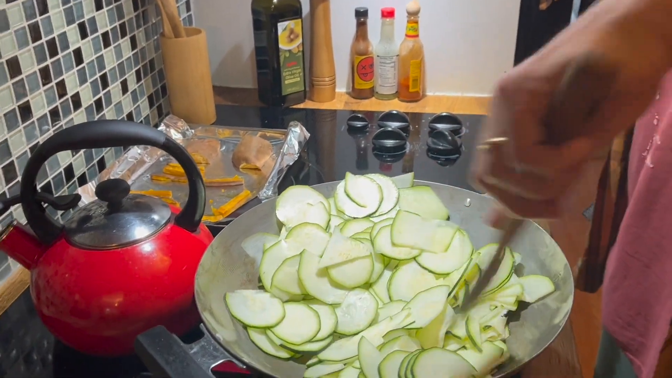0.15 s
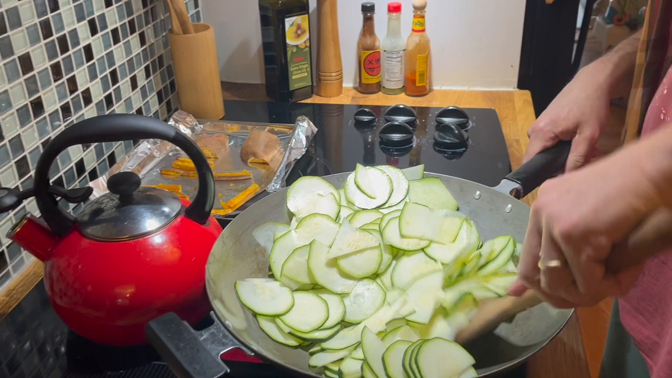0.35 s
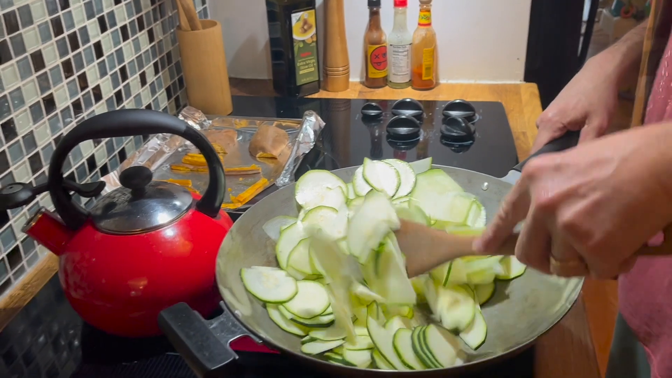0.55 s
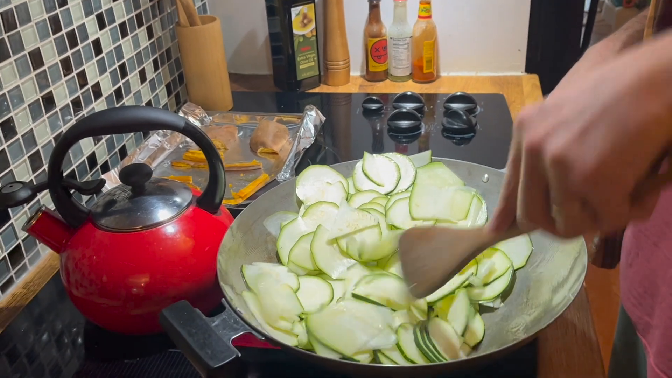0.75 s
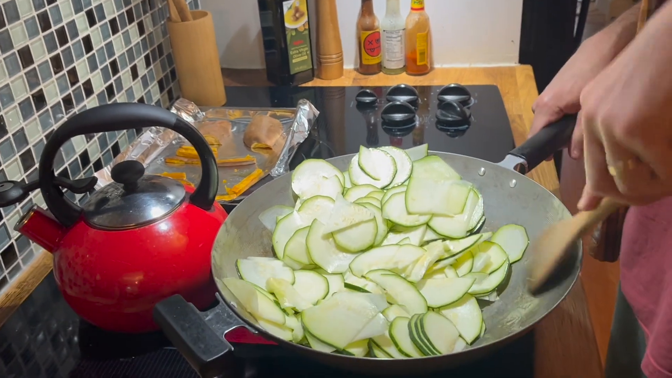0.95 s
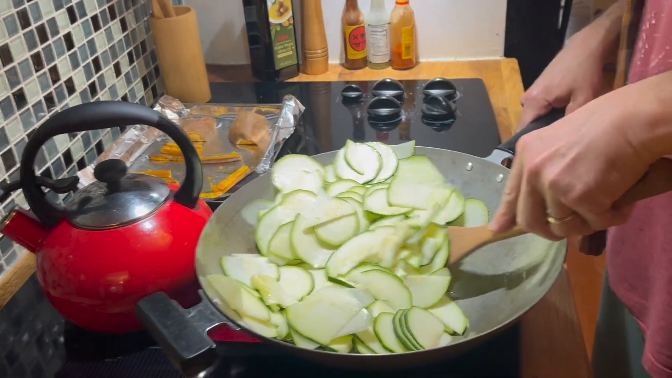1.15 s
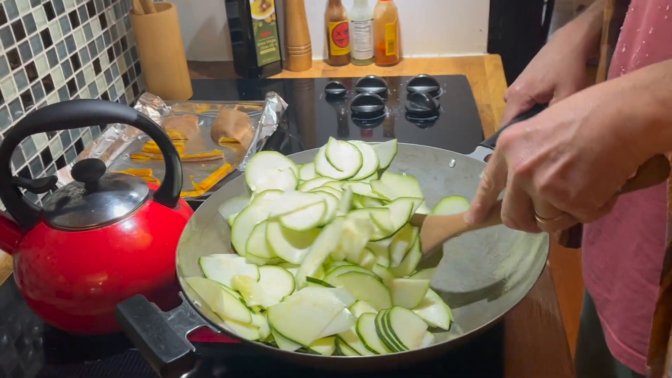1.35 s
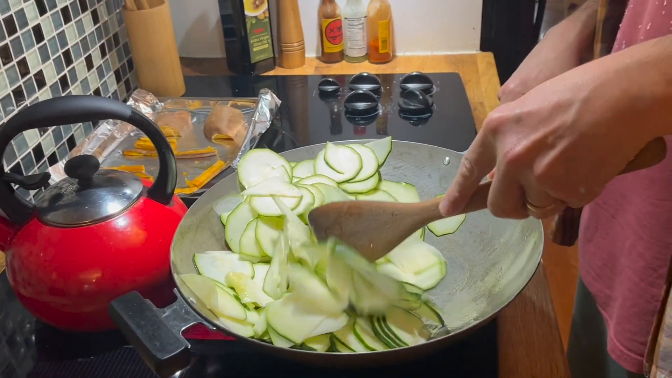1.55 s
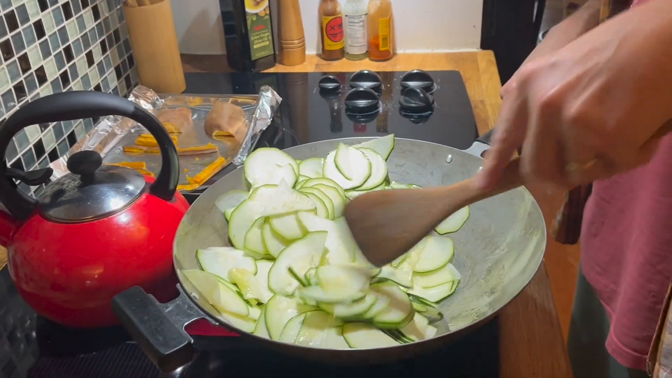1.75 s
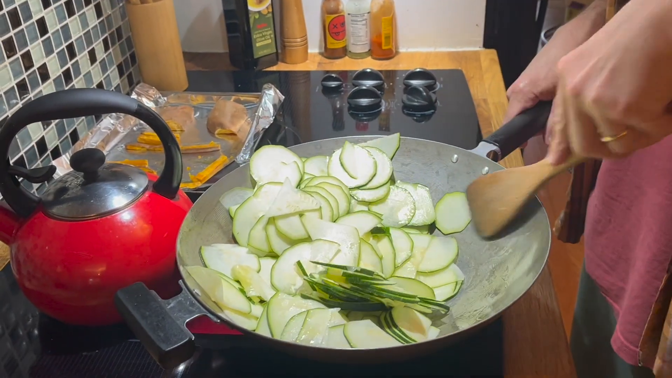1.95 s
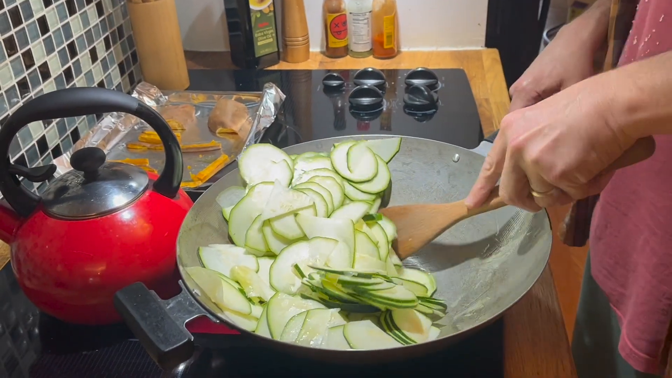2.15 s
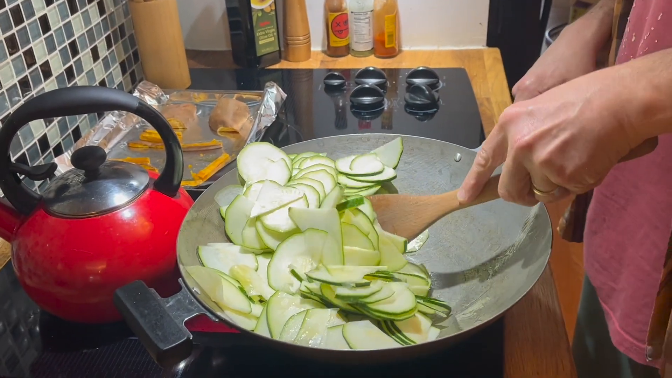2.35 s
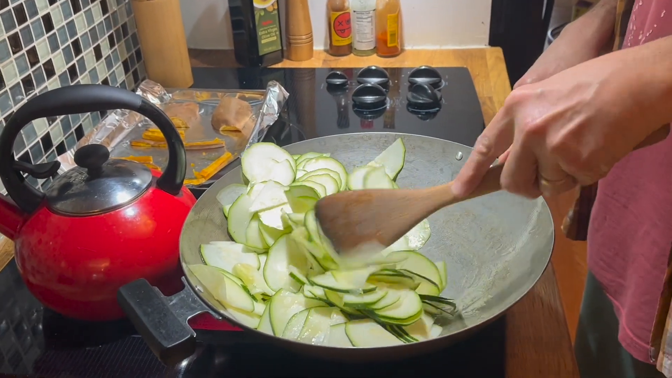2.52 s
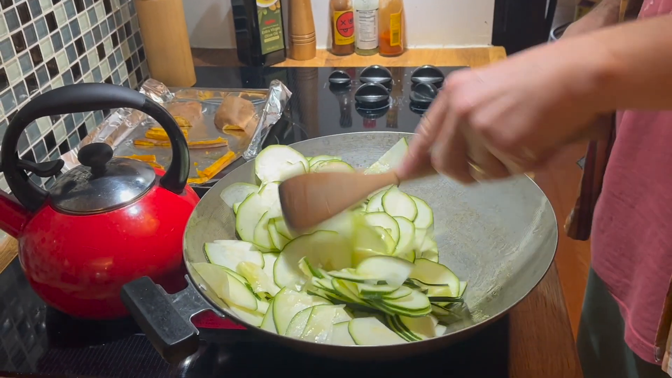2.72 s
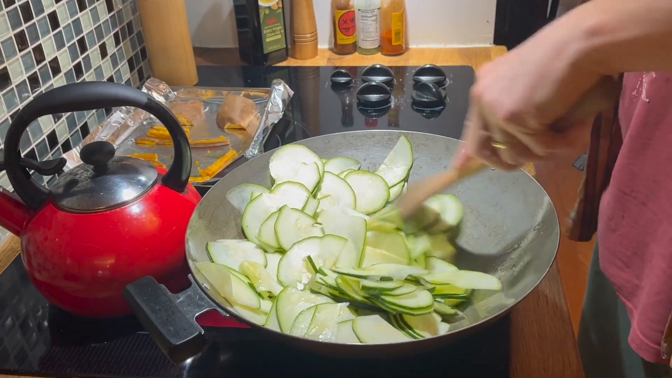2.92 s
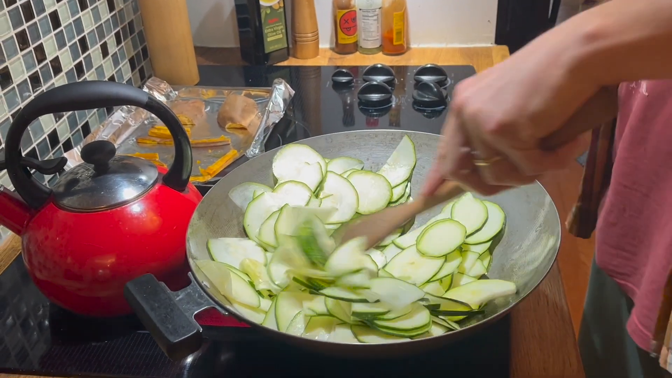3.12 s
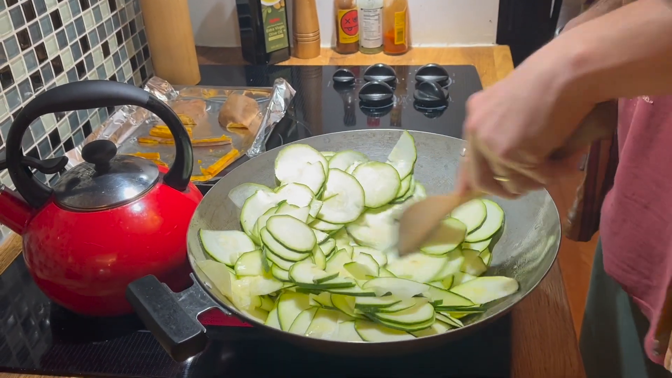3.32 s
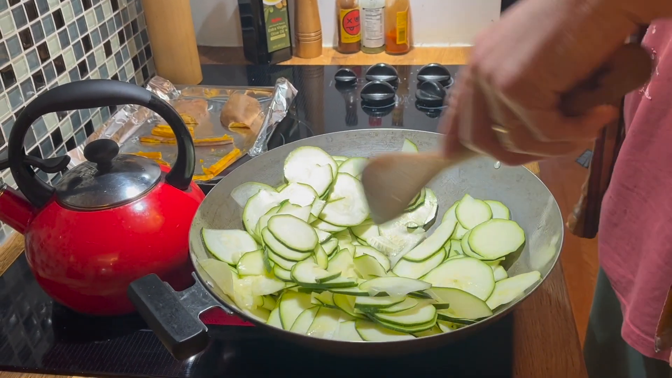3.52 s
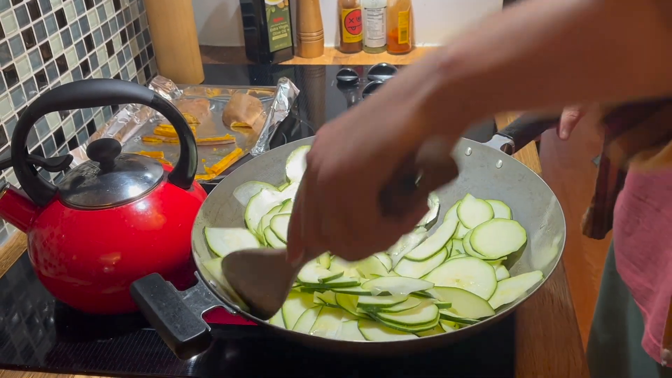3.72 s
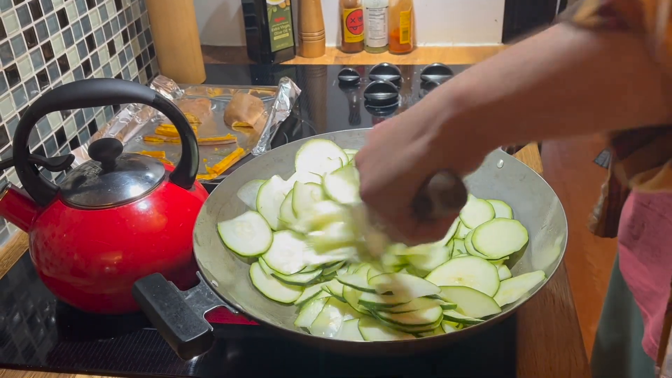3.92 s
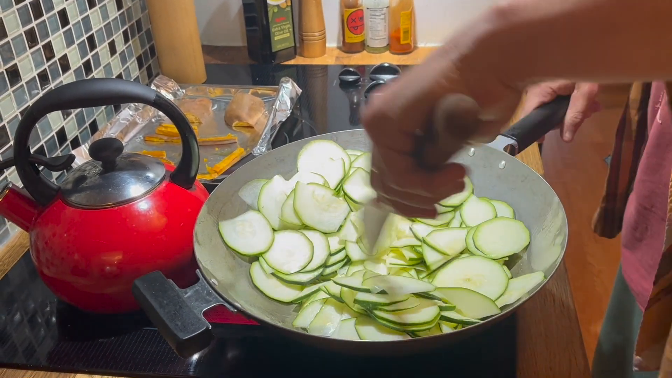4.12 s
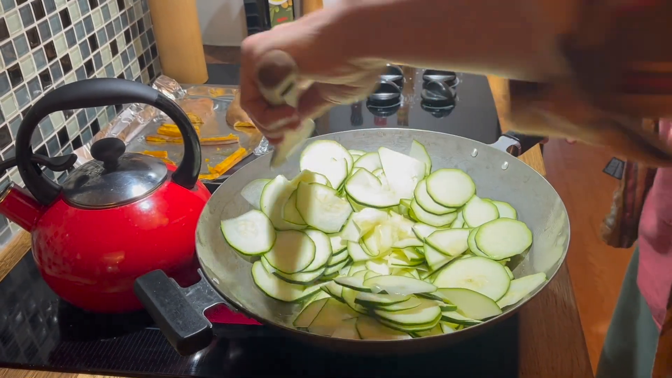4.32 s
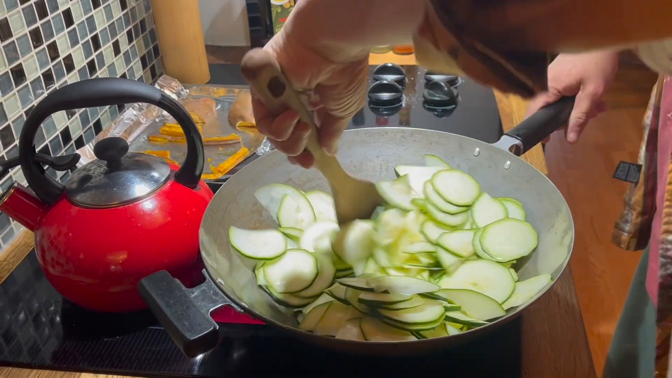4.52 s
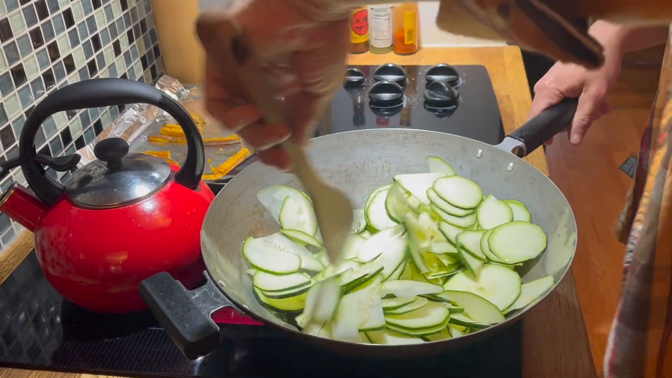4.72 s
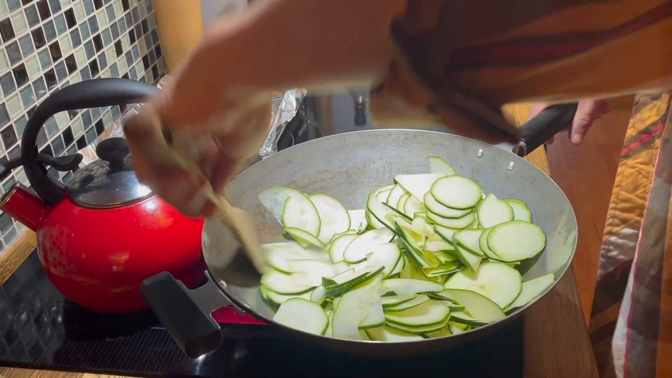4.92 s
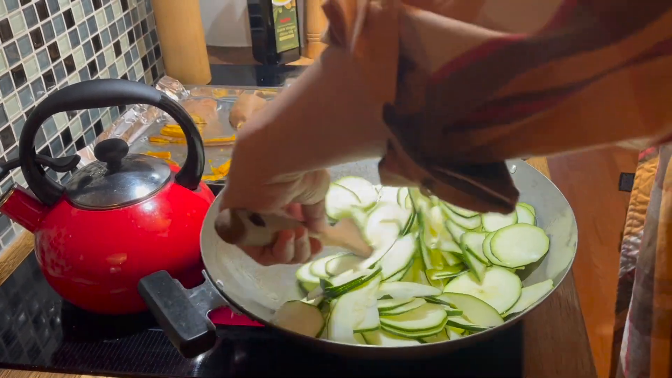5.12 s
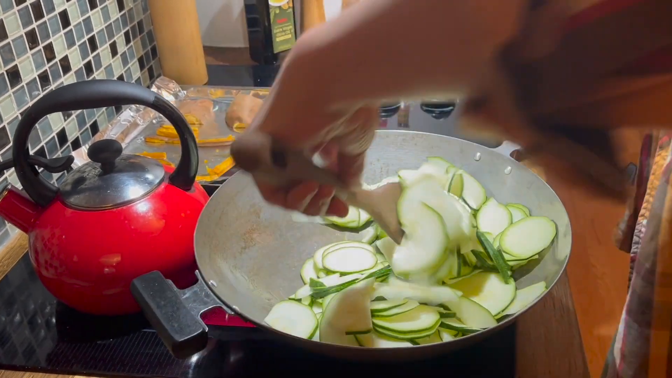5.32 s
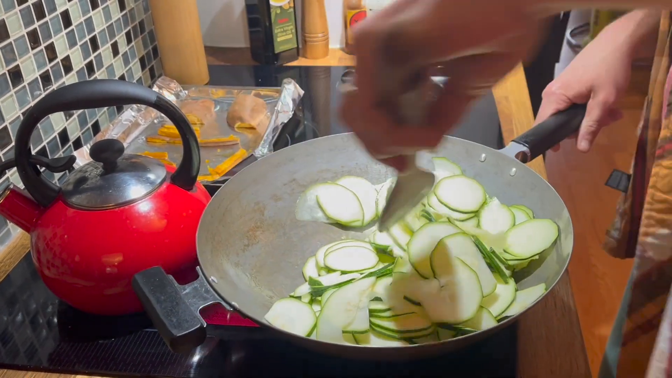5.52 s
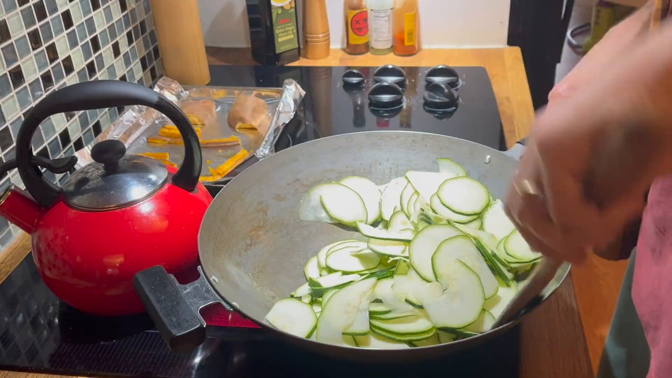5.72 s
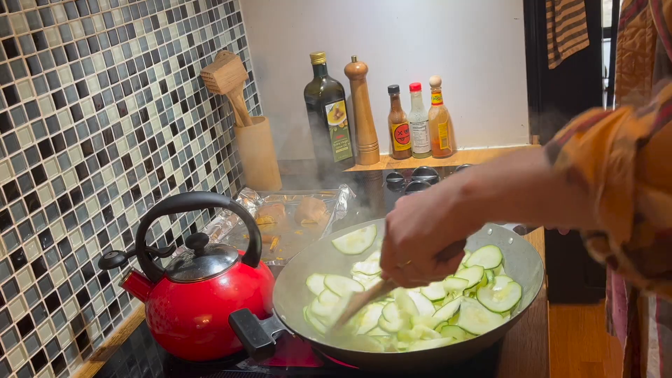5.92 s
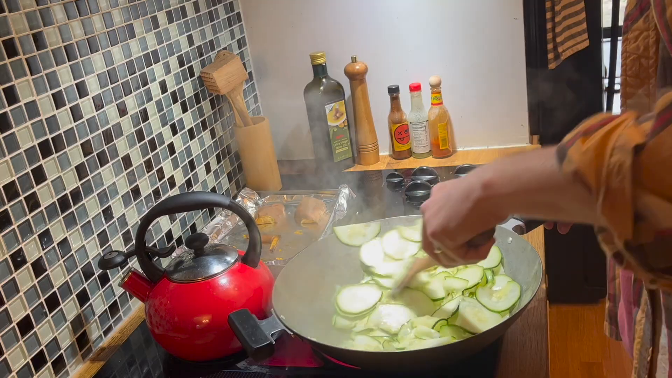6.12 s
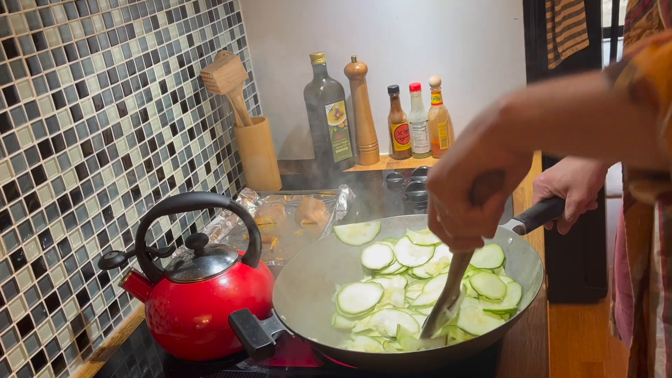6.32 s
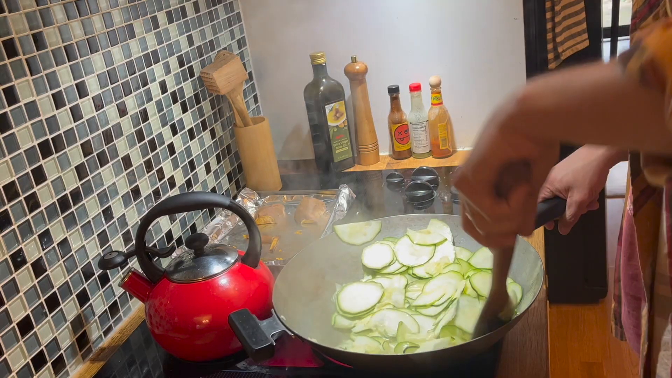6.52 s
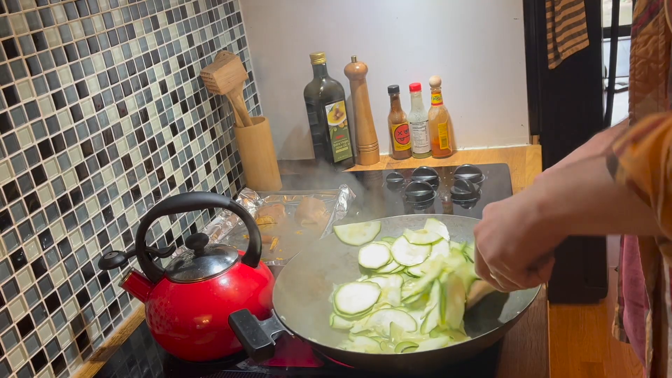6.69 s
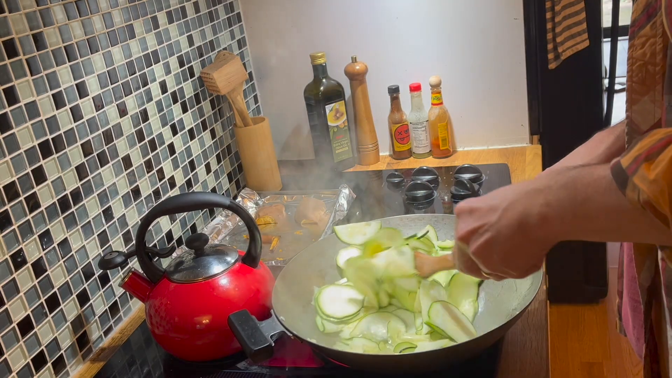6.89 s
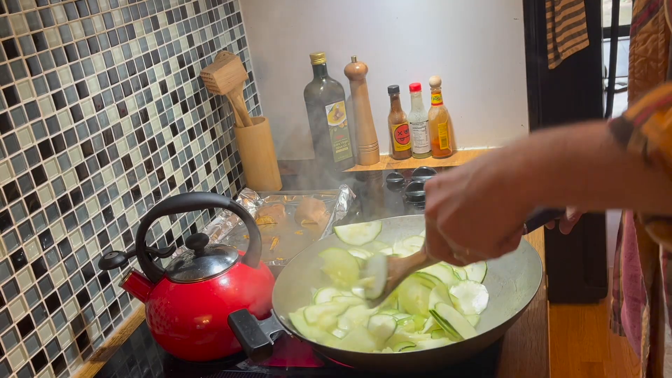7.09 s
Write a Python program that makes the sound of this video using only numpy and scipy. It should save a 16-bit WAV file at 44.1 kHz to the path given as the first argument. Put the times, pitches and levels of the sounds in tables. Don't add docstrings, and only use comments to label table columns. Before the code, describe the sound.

Close, bright vegetable frying with wooden spoon scrapes, a few hard pan knocks, soft low thumps on the hob and a faint fan drone.

```python
import sys
import numpy as np
from scipy import signal
from scipy.fft import rfft, irfft, next_fast_len
from scipy.io import wavfile
from scipy.ndimage import uniform_filter1d, map_coordinates

SR = 44100
rng = np.random.default_rng(int(sys.argv[2]) if len(sys.argv) > 2 else 0)


def gain_from_db(level_db):
    decades = np.asarray(level_db, float) / 20
    return 10 ** decades


def to_wav(s):
    ch = np.atleast_2d(s).T
    pcm = np.round(np.clip(ch, -1, 1) * 32767)
    wavfile.write(sys.argv[1], SR, pcm.astype(np.int16))


N = 315315


def unit(x):
    return x / np.sqrt(np.mean(x ** 2) + 1e-20)


def along(points, hz):
    f, v = np.transpose(points)
    return np.interp(np.log(hz + 1), np.log(f + 1), v)


def curves(rows):
    s, *cols = np.transpose(rows)
    return [np.interp(np.arange(N) / SR, s, c) for c in cols]


def wobble(rate_hz):
    knots = rng.standard_normal(int(N * rate_hz / SR) + 4)
    return map_coordinates(knots, [np.arange(N) * rate_hz / SR])


def filtered(x, response):
    m = next_fast_len(N + SR // 2)
    return irfft(rfft(x, m) * response(np.fft.rfftfreq(m, 1 / SR)), m)[..., :N]


def rush(spectrum, patchy_db, count=0, spike_db=0, grain_db=-60):
    z = signal.stft(rng.standard_normal(N), nperseg=512)[2]
    field = uniform_filter1d(rng.standard_normal(z.shape), size=3, axis=0)
    field = uniform_filter1d(field, size=10, axis=1)
    hiss = signal.istft(z * gain_from_db(patchy_db * unit(field)), nperseg=512)[1][:N]
    when, size = rng.random((count, 2)).T
    bursts = np.bincount((when * N).astype(int), gain_from_db(-spike_db * np.log(size + .01)), N)
    puff = np.exp(-np.arange(160) / 40.0)
    grains = np.convolve(bursts, puff)[:N] * rng.standard_normal(N)
    mix = unit(hiss) + gain_from_db(grain_db) * unit(grains)
    return unit(filtered(mix, lambda hz: gain_from_db(along(spectrum, hz))))


def add(track, s, sound):
    track[round(s * SR):][:len(sound)] += sound


def late_change():
    start_s, lasts_s = 5.87, 0.23
    return np.clip((np.arange(N) / SR - start_s) / lasts_s, 0, 1)


def frying():
    # t/s, boiling fizz level/dB, spoon scrape level/dB, heap shove level/dB
    stir = [(0.0, -46.5, -35, -41.5), (0.5, -47, -39.5, -42), (0.96, -49, -35.5, -40),
            (1.47, -46, -38, -41.5), (1.89, -50, -37, -41.5), (2.37, -45.5, -41, -42),
            (2.77, -49.5, -35, -39), (3.01, -49, -37.5, -43.5), (3.54, -48.5, -37.5, -45.5),
            (4.02, -52, -39, -43), (4.62, -51, -40, -43.5), (4.98, -47, -37.5, -43),
            (5.2, -45.5, -43.5, -48.5), (5.65, -45, -38.5, -46), (5.89, -47.5, -40, -41),
            (6.43, -43.5, -38, -44), (6.91, -50.5, -40.5, -40.5), (7.15, -53, -38.5, -39)]
    # f/Hz, level/dB
    fizz_spectrum = [(4500, -38), (6500, -4), (8500, 0), (10800, -1.5), (12500, -5.5), (15600, -8)]
    spit_spectrum = [(2200, -22), (3200, 0.5), (4600, 0.5), (5500, -3), (7500, -10.5), (10000, -15.5),
                     (15000, -40)]
    scrape_spectrum = [(1000, -33), (1650, -2), (1900, 1), (2100, -0.5), (2300, -2), (2650, -3.5),
                       (3000, -5.5), (4200, -29), (8000, -50)]
    shove_spectrum = [(250, -19), (480, -11.5), (600, -3.5), (780, -4), (950, 0), (1150, -3.5), (1400, 2.5),
                      (1650, -7), (2300, -45), (5000, -60)]
    fizz_db, scrape_db, shove_db = curves(stir)
    spit_db = -40.5 + 0.57 * (fizz_db - fizz_db.mean()) + 0.49 * (scrape_db - scrape_db.mean())
    spit_db = spit_db + 1 * late_change()

    surge = wobble(14)
    fizz_gain = gain_from_db(fizz_db + 5.5 + 0.76 * surge + 0.85 * wobble(30))
    spit_gain = gain_from_db(spit_db + 0.44 + 0.93 * surge + 0.086 * wobble(25))
    scrape_gain = gain_from_db(scrape_db + 0.17 + 0.34 * surge + 1.6 * wobble(23))
    shove_gain = gain_from_db(shove_db + 1.56 + 0.78 * surge + 1.5 * wobble(13))
    fizz = fizz_gain * rush(fizz_spectrum, 3.3, count=6000, spike_db=5.5, grain_db=-4)
    spit = spit_gain * rush(spit_spectrum, 3.1, count=3000, spike_db=4.5, grain_db=-4.5)
    scrape = scrape_gain * rush(scrape_spectrum, 2.2, count=1500, spike_db=2.5, grain_db=-6)
    shove = shove_gain * rush(shove_spectrum, 2.3, count=600, spike_db=3, grain_db=-6.5)

    boil = bubbles(scrape_db - 6.5, count=2500, hz=2059, spread=0.159)
    boil += bubbles(shove_db - 10.5, count=1200, hz=996, spread=0.349)
    boil += bubbles(spit_db - 10.5, count=3000, hz=4300, spread=0.248)
    return fizz + spit + scrape + shove + boil


def bubbles(level_db, count, hz, spread):
    when, size = rng.random((count, 2)).T
    pitch = hz * np.exp(spread * rng.standard_normal((count, 1)))
    t = np.arange(600) / SR
    envelope = np.exp(-t * pitch / 5.5) * (1 - np.exp(-t * pitch / .8))
    ring = np.sin(2 * np.pi * pitch * t) * envelope * gain_from_db(-3.5 * np.log(size + 0.03))[:, None]
    spot = (when * N).astype(int)[:, None] + np.arange(600)
    track = np.bincount(spot.ravel(), ring.ravel(), N + 600)
    return gain_from_db(level_db) * unit(track[:N])


def spoon():
    # t/s, peak level/dB, gap to rebound/s, rebound over blow/dB, rattle level/dB
    knock = [
        (.1866, -3, 0.0043, 1, -11),
        (.915, -11, .0033, 2, -5.5),
        (1.909, -17.5, .004, -12, -8),
        (3.6757, -5.5, 0.0059, -22, -11.5),
        (4.8344, -9, .0022, -3, -5.5),
        (5.645, -8, 0.0063, -1, -9.5),
    ]
    moves = [
        .5,
        1.5,
        4.5,
        5.5,
    ]
    # f/Hz, level struck at spots 1 to 5/dB
    pan = [(375, -15, -18, -8, -5, -11), (555, -0.5, 0, -4, -6, 5.5), (826, -8, -12, 3.5, -2, -6),
           (1042, -1.5, -8, -1, 1, 5), (1280, 3.5, -11, 9.5, 4, 6.5), (1470, -7, 7, 9.5, 0, 6.5),
           (2205, -1.5, -8, 3, -6, -6), (2420, 5.5, -1, -8, 1, -2.5), (2600, 6.5, 9, -1, -9, 3.5),
           (3208, 3.5, 0, 3, -3, -1), (4007, 0.5, -17, 4, -14, -2), (4484, -5, 2.5, -3.5, -1, -8),
           (4862, -3.5, 0.5, -17, 1, -14), (5700, -1, -7, -13, 1, -20)]
    hard_hz = [6800, 6500, 6000, 7100, 4500]
    skip_grows, skip_loss_db, crack_db = 1.3, 9.5, -12.5
    t = np.arange(SR // 6) / SR
    shake = np.zeros((len(moves) + 1, N + SR))
    for blow_s, blow_db, gap_s, rebound_db, rattle_db in knock:
        for k in range(4):
            s = blow_s + gap_s * sum(skip_grows ** j for j in range(k))
            db = blow_db + (k > 0) * (rebound_db - skip_loss_db * (k - 1))
            rattle = (gain_from_db(-60 * t / 0.025) + 0.15 * gain_from_db(-60 * t / 0.15)) * rng.standard_normal(len(t))
            contact = (t == 0) + gain_from_db(rattle_db - 13) * rattle
            add(shake[np.searchsorted(moves, s)], s, gain_from_db(db + 19) * contact)

    def modes(f):
        total = 0
        for c, *db in pan:
            width = 110 + 0.047 * c
            late_s = .0007 * np.sqrt(340 / c) + .0005 * np.sin(c) ** 2
            ring = 1j * f * width / (c * c - f * f + 1j * f * width)
            total = total + gain_from_db(db)[:, None] * np.exp(-2j * np.pi * f * late_s) * ring
        return total

    def struck(f):
        top = np.array(hard_hz)[:, None]
        give = top ** 2 / (top ** 2 - f * f + 1.3j * f * top)
        crack = gain_from_db(crack_db) * 1j * f / (700 + 1j * f)
        return (modes(f) * give + crack) * give

    return filtered(shake[:, :N], struck).sum(axis=0)


def pops():
    # t/s, peak level/dB, f/Hz
    pockets = [(0.839, -19, 1400), (1.0034, -20, 2090), (1.1104, -21, 2970), (1.2705, -20, 1680),
               (1.3468, -21, 1810), (1.4421, -20, 1910), (1.5294, -20, 1910), (1.6884, -20, 1990),
               (2.6834, -21, 2130), (2.8195, -21, 2660), (2.9028, -20, 1430), (2.9262, -17, 2160),
               (3.2889, -19, 1990), (3.3443, -18, 2120), (3.3767, -20, 2260), (3.5843, -19, 1970),
               (3.6257, -20, 1910), (3.715, -21, 2020), (3.8801, -20, 1930), (5.5408, -20, 2010),
               (6.0945, -19, 1760)]
    # t/s, peak level/dB, band centre f/Hz
    ticks = [
        (1.068, -17, 3020),
        (1.311, -20, 2600),
        (2.4525, -22, 2520),
        (2.545, -22, 4300),
        (2.7407, -21, 1500),
        (2.9924, -23, 3300),
        (3.0096, -17, 3100),
        (4.3897, -25, 1770),
    ]
    track, t = np.zeros(N + SR), np.arange(SR // 40) / SR
    for s, db, hz in pockets:
        tone = np.sin(2 * np.pi * hz * t) + .5 * rng.standard_normal(len(t))
        add(track, s, gain_from_db(db - 3 - 60 * t / .016) * (1 - np.exp(-t / .0004)) * tone)
    for s, db, hz in ticks:
        burst = signal.lfilter(*signal.iirpeak(hz, 2.3, SR), rng.standard_normal(len(t)))
        add(track, s, gain_from_db(db - 2.5 - 60 * t / 0.03) * unit(burst))
    return filtered(track[:N], lambda hz: 1 / (1 + (hz / 5500) ** 4))


def spatter():
    # t/s, peak level/dB
    droplets = [
        (5.148, -28),
        (5.3321, -27),
        (5.4353, -31),
        (5.5401, -22),
        (5.7332, -32),
        (5.8748, -30),
        (6.0958, -33),
        (6.4755, -32),
        (6.5378, -28),
    ]
    track, t = np.zeros(N + SR), np.arange(SR // 40) / SR
    for s, db in droplets:
        add(track, s, gain_from_db(db - 1 - 60 * t / .012) * rng.standard_normal(len(t)))
    return filtered(track[:N], lambda f: 1j * f * 7000 / (8800 ** 2 - f * f + 1j * f * 7000))


def hob():
    # t/s, peak level/dB, f/Hz, slap level/dB
    thuds = [(0.219, -25.5, 91.5, -8), (0.426, -25, 137, -5), (0.949, -26, 205, -14), (3.701, -26, 130, -5),
             (4.481, -26, 140, -13), (4.5, -22, 91, -10.5), (4.619, -31, 120, -26), (4.859, -24, 144, -8),
             (5.121, -26, 173, -6.5), (5.147, -20, 116, -17.5), (5.68, -24, 91.5, -7),
             (6.029, -32, 157, -8)]
    track, slaps, t = np.zeros(N + SR), np.zeros(N + SR), np.arange(SR // 5) / SR
    for s, db, hz, slap_db in thuds:
        fade = gain_from_db(db - 60 * t / 0.073) * (1 - np.exp(-t / 0.0018))
        add(track, s, gain_from_db(-2) * fade * np.sin(2 * np.pi * hz * t))
        add(slaps, s, gain_from_db(slap_db + 20) * fade * rng.standard_normal(len(t)))
    flat_base = lambda f: 1j * f * 520 / (310 ** 2 - f * f + 1j * f * 520)
    return track[:N] + filtered(slaps[:N], flat_base) + sway()


def sway():
    # t at the height/s, level/dB, rise/s
    jolts = [(.232, -35, .015), (.305, -31.5, .015), (.355, -40, 0.0092), (.44, -38, 0.019),
             (.49, -45, .012), (.96, -48, 0.014), (1.6, -82, 0.027), (1.96, -54, 0.016),
             (2.135, -41, 0.0078), (2.84, -44, 0.013), (2.93, -38, .02), (3.05, -46, 0.023),
             (3.29, -39, 0.026), (3.33, -36, 0.016), (3.72, -39, .02), (3.97, -51, 0.018),
             (4.444, -32, 0.019), (4.5, -31, 0.0215), (4.54, -29, 0.011), (4.62, -34.5, 0.027),
             (4.97, -44, .03), (5.04, -37, .015), (5.155, -31, .02), (5.28, -49, 0.022),
             (5.684, -31, 0.016), (5.755, -42, .015), (6.029, -38, 0.02), (6.14, -51, 0.016),
             (6.236, -44, 0.01), (6.68, -43, .035)]
    # f/Hz, level/dB
    rumble = [(27, -48), (39, -7), (50, -5), (63, -0.5), (80, -11), (110, -13), (200, -21), (600, -76)]
    sway_hz, noisy_share = 60.8, 0.33
    size, swing, t = np.zeros(N + SR), np.zeros(N + SR), np.arange(SR // 3) / SR
    for s, db, rise_s in jolts:
        bump = gain_from_db(db) * (t / rise_s * np.exp(1 - t / rise_s)) ** 2
        add(size, s - rise_s, bump)
        add(swing, s - rise_s, bump * np.sqrt(2) * np.sin(2 * np.pi * sway_hz * t))
    tremble = gain_from_db(-55 - 0.5 * wobble(9))
    return swing[:N] + (noisy_share * size[:N] + tremble) * rush(rumble, 0.43)


def extractor():
    # f/Hz, level/dB
    fan = [(25, -44), (60, 3.5), (110, -3.5), (200, 1.5), (290, -2.5), (325, -7), (370, -4), (416, -3.5),
           (470, -11), (575, 1.5), (640, -15), (900, -51), (3000, -63)]
    # f/Hz, rms level/dB, unsteadiness/0-1
    hum = [
        (239, -44.5, 0.35),
        (353, -63.5, 0.86),
    ]
    t = np.arange(N) / SR
    air_db = -55.5 + 2 * wobble(3.125)
    drone_db = -57 + 1.3 * wobble(1.93) - 15 * late_change()
    lines = np.zeros(N)
    for hz, db, loose in [(120.8, drone_db + 2.5, 0.42), *hum]:
        swell = 1 + loose * wobble(8.2) / 2
        lines += gain_from_db(db) * np.sqrt(2) * swell * np.sin(2 * np.pi * hz * t + loose * wobble(5.2))
    return lines, gain_from_db(air_db + 6.5) * rush(fan, 4)


def ports(x):
    # f/Hz, correlation/-1 to 1
    alike = [(60, 1), (200, 0.9), (500, 0.67), (900, 0.73), (1350, 0.56), (1580, -0.21), (1900, 1),
             (3000, 0.92), (4500, 0.96), (6500, 0.99), (15000, 0.9)]
    # f/Hz, phase/rad
    lead = [(1500, 0), (3100, -.35), (4700, -.05), (5800, .85), (6600, 1.15), (8400, 3.14), (10000, 4.7),
            (11850, 6.28), (13700, 7.9), (15300, 9.42)]
    t = np.arange(SR // 4) / SR
    tail = rng.standard_normal((2, len(t))) * gain_from_db(-60 * t / .22)
    m = next_fast_len(N + SR // 2)
    scatter = rfft(tail, m)
    scatter /= np.sqrt(uniform_filter1d(np.abs(scatter) ** 2, m // 200, axis=1))
    near = 1 + gain_from_db(-11) * scatter[1]
    side = np.array([[1], [-1]])

    def response(hz):
        angle = np.arccos(np.clip(along(alike, hz), -1, 1)) / 2
        paths = np.cos(angle) * near + side * np.sin(angle) * scatter[0]
        return paths * np.exp(-.5j * side * along(lead, hz))

    return filtered(x, response)


def scene():
    lines, air = extractor()
    sources = frying() + spoon() + pops() + spatter() + hob() + air
    return ports(sources) + lines * gain_from_db([[-1.6], [1.6]])


def top_cut(x):
    return signal.sosfilt(signal.butter(12, 15750, fs=SR, output="sos"), x)


def record(dry):
    level = dry / (1 + np.abs(dry) ** 4) ** .25
    mix = filtered(level, lambda hz: hz < 15750)
    return top_cut(mix)


dry = scene()
out = record(dry)
to_wav(out)
```